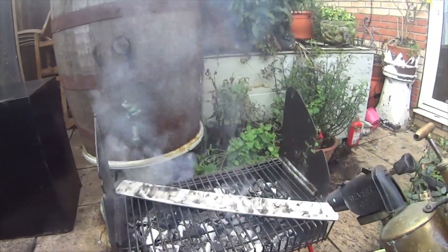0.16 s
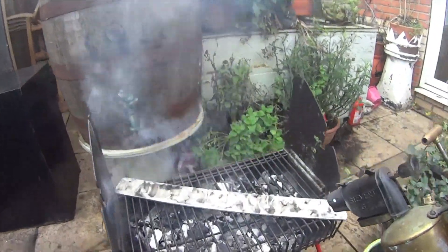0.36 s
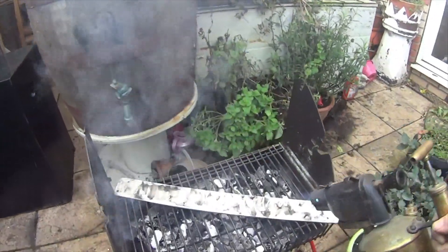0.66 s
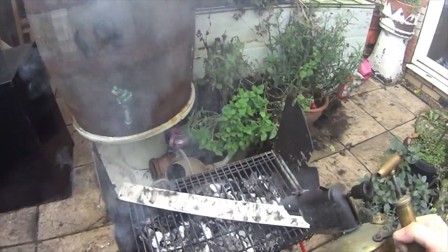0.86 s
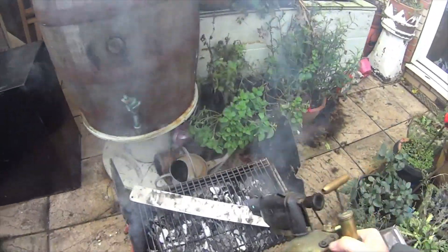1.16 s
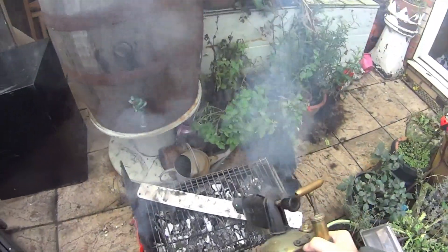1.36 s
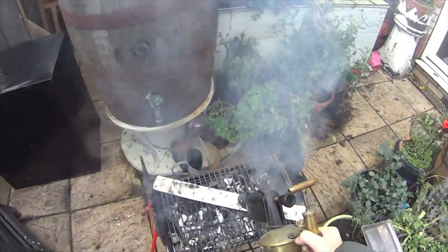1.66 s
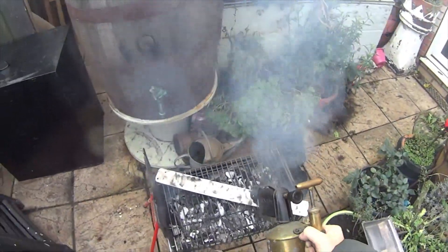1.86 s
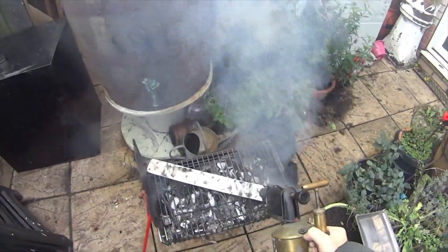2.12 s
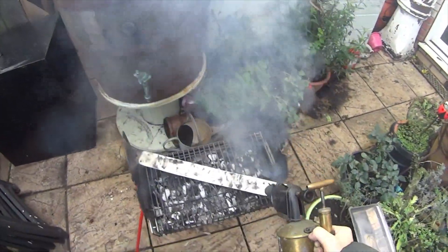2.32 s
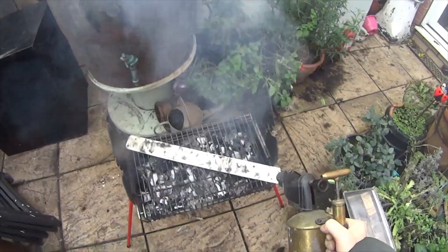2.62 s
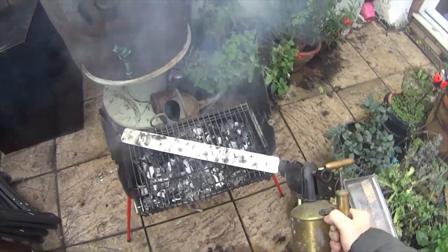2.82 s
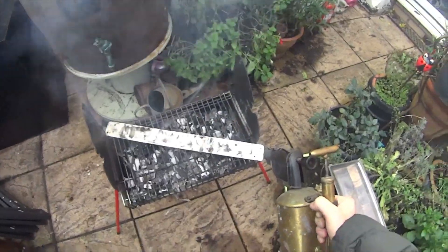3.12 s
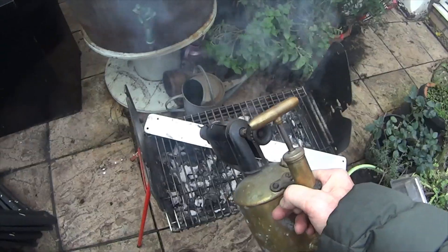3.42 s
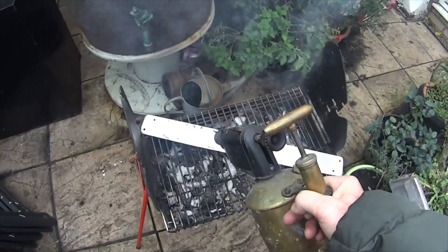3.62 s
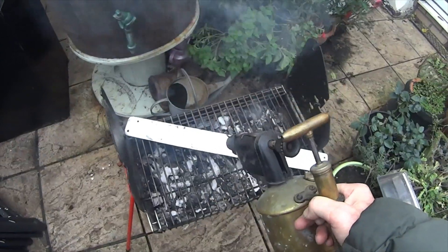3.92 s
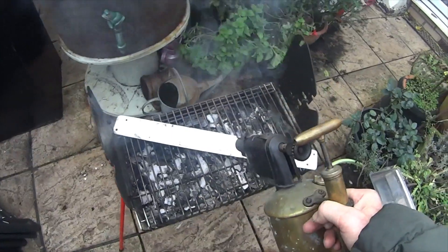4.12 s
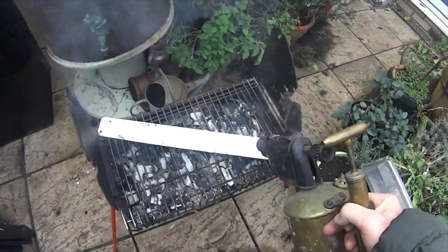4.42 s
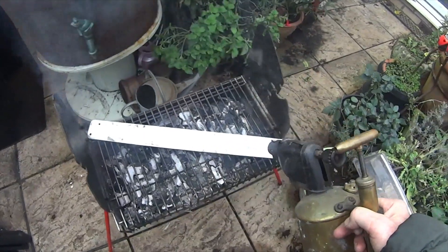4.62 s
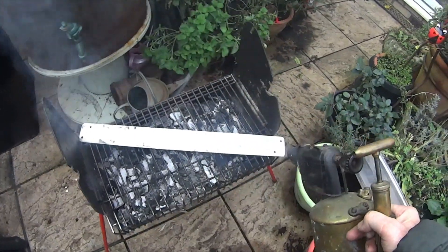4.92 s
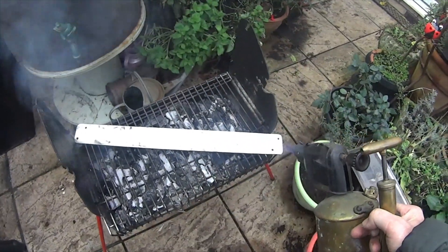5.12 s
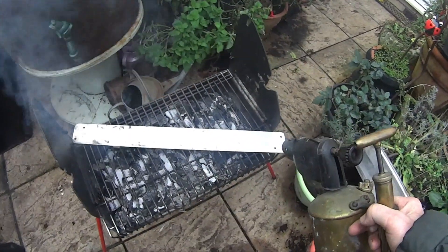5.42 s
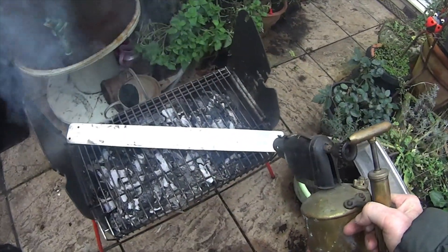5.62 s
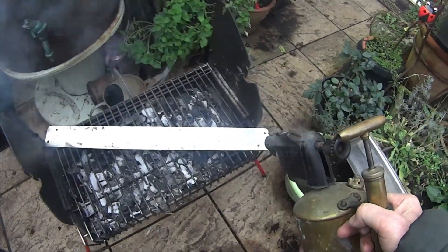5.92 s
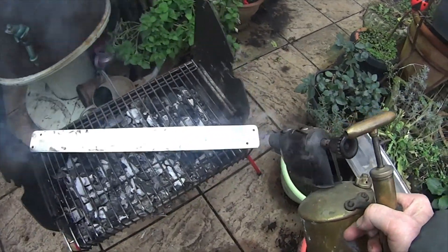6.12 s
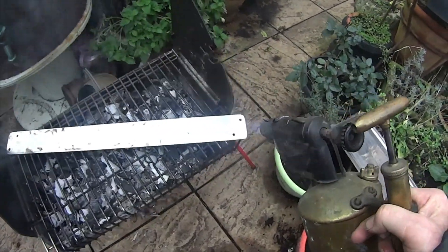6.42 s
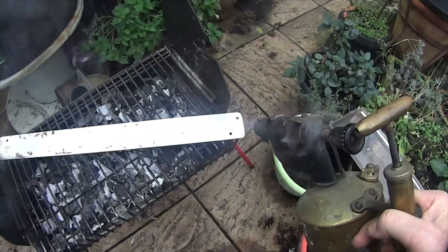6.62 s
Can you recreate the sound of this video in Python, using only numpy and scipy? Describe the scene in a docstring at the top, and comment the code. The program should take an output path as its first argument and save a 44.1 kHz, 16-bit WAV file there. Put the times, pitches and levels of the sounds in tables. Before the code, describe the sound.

A petrol blowtorch burns close to a hand-held microphone in a paved yard, giving a steady, fluttering hiss with a thin whistle and a faint low roar. Metal clinks lightly twice. A finger then knocks and rubs on the microphone, briefly muffling the flame, and the sound cuts out for an instant. The hiss returns and grows a little louder.

```python
"""A petrol blowtorch heats an aluminium strip on a barbecue in a paved yard, near a hand-held camera.
The flame flutters and roars in its tube, the vapour jet hisses; echoes off grill and paving sweep.
At 2 s metal clinks twice and the burner starts to turn away. Just before 3 s a finger knocks, rubs and
briefly covers the microphone. At 3.2 s the sound drops out for a moment.
The torch then burns on, grows louder and draws back from the grill."""
import sys
import numpy as np
from scipy import signal
from scipy.fft import rfft, irfft, next_fast_len
from scipy.io import wavfile
from scipy.ndimage import uniform_filter1d, minimum_filter1d

SR = 44100
rng = np.random.default_rng(int(sys.argv[2]) if len(sys.argv) > 2 else 0)


def output_pcm(signal):
    """Save a mono or channel-first signal as 16-bit PCM at the path in sys.argv[1].

    Samples are clipped to [-1, 1] before scaling.
    """
    pcm = np.clip(np.atleast_2d(signal).T, -1, 1) * 32767
    wavfile.write(sys.argv[1], SR, np.round(pcm).astype(np.int16))


N = 298116

# Flame and jet loudness as the torch moves. Each row: time in seconds, gain in dB.
TORCH_GAIN = [(0, -16.5), (1.3, -16), (2.05, -19.5), (2.45, -18), (3.22, -19), (3.35, -20), (3.75, -18.5),
              (4.1, -15.5), (5.3, -16), (6.75, -14.5)]
# Noise spectra; side and rear are aspects of the burner. Each row: frequency in Hz, relative density in dB.
FLAME_SIDE_SPECTRUM = [(450, -46.5), (650, -29), (760, -17.5), (950, -12.5), (1300, -6.5), (1500, -10),
                       (1750, -8), (2000, 3), (2300, 0.5), (2700, -3.5), (3200, -5), (3550, -13.5),
                       (3850, -17.5), (4500, -37), (6000, -72.5)]
FLAME_REAR_SPECTRUM = [(450, -37), (650, -26), (800, -15.5), (970, -16), (1150, -9.5), (1350, -10.5),
                       (1750, -11), (2060, 0), (2500, -0.5), (3150, -5.5), (3380, -10), (3600, -10),
                       (3950, -20.5), (6000, -79.5)]
JET_SIDE_SPECTRUM = [(3300, -22), (4000, -4), (5000, 5), (5900, -6), (6600, -2), (7300, -5), (8300, -3.5),
                     (9200, -11), (10000, -7.5), (11200, -14.5)]
JET_REAR_SPECTRUM = [(3300, -25), (4000, -3), (5300, 3), (6000, -11), (6800, -0.5), (7400, -5.5),
                     (8200, -5), (9200, -13.5), (10100, -7), (11200, -16.5)]
ROAR_SPECTRUM = [(20, -23), (90, -10.5), (160, -4), (260, 2), (400, -0.5), (560, -5.5), (770, -7.5),
                 (1200, -19)]
RUB_SPECTRUM = [(60, 4.5), (300, 1), (800, -1.5), (1700, 3.5), (2400, -13.5), (3600, 6), (4600, -9.5),
                (7500, -9), (11000, -24)]
# Burner resonances. Each row: frequency in Hz, width in Hz, side level in dB, rear level in dB.
BURNER_MODES = [(1337, 70, -23.5, -24.5), (2112, 130, -35.5, -16), (3605, 110, -27, -33)]
# Brief notes. Each row: middle in seconds, length in seconds, pitch in Hz, level in dB re their hiss.
FLAME_HOOTS = [(.03, 0.16, 2484, -4), (.25, 0.49, 1320, -12), (.28, .16, 2615, -7.5),
               (.39, .22, 2314, -5.5), (.61, .22, 3130, -7.5), (1.16, 0.21, 2222, -4.5),
               (1.45, .45, 2818, -6.5), (1.92, .22, 2413, -7.5), (2.29, .16, 1798, -6.5),
               (2.41, .18, 2192, -3), (2.58, .22, 2453, -7.5), (2.76, .12, 2790, -1.5),
               (3.04, .1, 1934, -4), (3.17, .12, 2746, -1.5), (3.6, .17, 2620, -3.5),
               (4.15, .2, 2325, -2.5), (4.31, .2, 2764, -5), (4.7, .22, 2495, -2), (5.58, .55, 3116, -8),
               (6.16, .3, 2130, -5.5)]
JET_SWISHES = [(.05, 0.4, 4570, -4), (.44, .14, 6220, -8.5), (.63, .14, 4310, -0.5)]
# Nozzle whistle. Each row: time in seconds, pitch in Hz, level in dB re the jet's hiss.
JET_WHISTLE = [(0, 6210, -22), (1.4, 6830, -8.5), (3.3, 6734, -7.5), (5.5, 6796, -11.5), (6.1, 6930, -5)]
# Extra vapour. Each row: start in seconds, length in seconds, level in dB re the jet.
JET_SPURTS = [(.45, .17, -1.5), (1.42, 0.17, 1), (4.47, .07, -6.5), (5.8, .08, -4)]
# Burner over the grill. Each row: time in seconds, reach from 0 to 1.
GRILL_REACH = [(0, 0.06), (.6, 0.1), (1.2, 0.66), (1.8, 0.98), (3.35, .4), (3.65, 0.98), (4.15, .85),
               (4.7, 0.56), (6.75, 0.08)]
# Echo off the strip; its edge can flip the sign. Each row: time in seconds, delay in ms, signed gain.
STRIP_ECHO = [(.4, .78, -0.048), (1.2, 1.28, 0.23), (3.23, 1.13, 0.021), (3.34, 1.416, -.3),
              (3.9, 1.19, -0.092), (4.5, 0.7, 0.036), (6.75, 0.61, 0.19)]
# Torch direction. Each row: time in seconds, left minus right in dB.
TORCH_PAN = [(.25, -2.5), (1.3, -.6), (2.3, -2), (3.3, 0), (4.1, .8), (5.2, -0.6)]
# Stereo likeness in the yard. Each row: frequency in Hz, left-right correlation.
STEREO_CORRELATION = [(60, 0.24), (160, 0.51), (400, 0.17), (660, 0.078), (1060, 0.64), (1700, 0.69),
                      (2750, 0.87), (4400, 0.79), (7200, 0.37), (11000, 0.43)]
# Finger knocks. Each row: start in seconds, thump peak in dB, thump cut-off in Hz, click drive in dB.
FINGER_KNOCKS = [(2.448, -19, 700, -45), (2.7514, -17, 504, -3), (2.784, -25, 400, -1.5),
                 (2.9076, -9, 750, -42), (2.943, 2, 3590, -10.5), (2.958, -9.5, 1780, -4.5)]
# Camera shell. Each row: frequency in Hz, width in Hz, gain in dB.
SHELL_MODES = [(3000, 770, -11), (5300, 310, 3.5), (6100, 170, -8), (10360, 2900, -17.5)]
# Hand movements. Each row: start in seconds, length in seconds, level in dB.
GRIP_SHIFTS = [(1.66, .03, -47), (1.94, .02, -45), (2.1, 0.29, -47), (2.45, .03, -37.5), (2.63, 0.053, -42),
               (2.735, 0.042, -31.5), (2.797, 0.036, -30.5), (2.89, 0.09, -26.5), (3.175, .012, -49)]
FINGER_RUBS = [(2.81, .17, -29.5), (2.89, 0.016, -24), (2.927, .007, -19)]
# Light metal contacts. Each row: start in seconds, gain in dB.
METAL_CONTACTS = [(2.019, -18), (2.047, -12.5)]
# Their ring. Each row: frequency in Hz, relative level in dB.
METAL_MODES = [(1390, 3.5), (4200, -12), (6850, -13.5)]

GAP_START_S, GAP_END_S = 3.218, 3.34


def torch(turn_start_s=1.99, turn_end_s=4.27, flutter_db=1.0, surge_db=0.57, spit_db=1.0, jet_db=-17.5):
    """Flame, jet and roar flutter with one shared fuel flow."""
    torch_db, = curves(TORCH_GAIN)
    rear = np.interp(seconds(), [turn_start_s, turn_end_s], [0, 1])
    flame, jet, roar = burner_flame(rear), vapour_jet(rear), low_roar()
    flow = unit(amp(flutter_db * wobble(320) + surge_db * wobble(35)))
    jet_gain = amp(jet_db + spit_db * wobble(25))  # fuel leaves the nozzle unevenly
    return flow * (amp(torch_db) * (flame + jet_gain * jet) + roar)


def burner_flame(rear):
    """Turbulent burning rings the tube and catches brief hollow notes."""
    hiss = aimed_noise(FLAME_SIDE_SPECTRUM, FLAME_REAR_SPECTRUM, rear)
    for hz, width_hz, side_db, rear_db in BURNER_MODES:
        mode = stereo_noise(lambda f: resonance(f, hz, width_hz) ** 2)
        hiss += amp(between((side_db, rear_db), rear)) * mode
    return voiced(hiss, passing_tones(FLAME_HOOTS, width_hz=84, sag_hz_per_s=60))


def vapour_jet(rear):
    """Vapour hisses, whistles and spurts from the nozzle."""
    hiss = aimed_noise(JET_SIDE_SPECTRUM, JET_REAR_SPECTRUM, rear)
    whistle = held_tone(*curves(JET_WHISTLE), width_hz=190)
    swishes = passing_tones(JET_SWISHES, width_hz=220, sag_hz_per_s=320)
    spurts = bursts(JET_SPURTS, attack_s=0.039, release_s=0.077)
    return voiced(hiss, whistle, swishes) * np.hypot(1, spurts)


def low_roar(boom_hz=382.3, boom_db=3, fade_db_per_s=5, before_gap_db=-37.5, after_gap_db=-40.5):
    """The flame's low roar, with a hollow boom that dies away."""
    noise = coloured_noise(ROAR_SPECTRUM)
    boom = held_tone(boom_hz, boom_db - fade_db_per_s * seconds(), width_hz=63)
    level_db = np.where(seconds() > GAP_START_S, after_gap_db, before_gap_db)
    return amp(level_db) * voiced(noise, boom)


def near_echoes(x, coals_gain=0.094, coals_ms=(3.0, 2.026), paving_gain=0.16, paving_ms=(4.05, 3.6)):
    """Strip, coals and paving comb the sound; notches and pan glide as the torch moves."""
    reach, = curves(GRILL_REACH)
    strip_ms, strip_gain = curves(STRIP_ECHO)
    pan_db, = curves(TORCH_PAN)
    paths = [(strip_gain, strip_ms),
             (coals_gain, between(coals_ms, reach)),
             (paving_gain, between(paving_ms, reach))]
    power = 1 + strip_gain ** 2 + coals_gain ** 2 + paving_gain ** 2
    return (x + echoes(x, paths)) / np.sqrt(power) * amp([pan_db / 2, -pan_db / 2])


def far_echoes(x, gain=0.12, nearest_ms=4.6, farthest_ms=17, drift_ms=0.15, count=7):
    """Weak later echoes off pots, drum and walls ripple the hiss."""
    paths = [(gain, ms + drift_ms * wobble(1.2)) for ms in np.geomspace(nearest_ms, farthest_ms, count)]
    return (x + echoes(x, paths)) / np.sqrt(1 + count * gain ** 2)


def knocks(thump_t60_s=0.026, click_t60_s=0.0098, grit=0.14):
    """Each knock pushes the camera body and clicks its plastic shell."""
    t = np.arange(SR // 8) / SR
    thumps, clicks = np.zeros(N), np.zeros(N)
    for start_s, thump_db, cutoff_hz, click_db in FINGER_KNOCKS:
        start = round(start_s * SR)
        push = (t == 0) + grit * rng.standard_normal(len(t)) * amp(-60 * t / thump_t60_s)
        thump = signal.sosfilt(signal.butter(2, [30, cutoff_hz], "band", fs=SR, output="sos"), push)
        thumps[start:][:len(t)] += amp(thump_db) * thump / np.abs(thump).max()
        clicks[start:][:len(t)] += amp(click_db - 60 * t / click_t60_s) * rng.standard_normal(len(t))
    shell = lambda f: sum(amp(db) * resonance(f, hz, width_hz) for hz, width_hz, db in SHELL_MODES)
    return thumps + filtered(clicks, shell)


def finger_rub(catch_db=1.0):
    """Skin catches and slips over the microphone."""
    friction = unit(amp(catch_db * wobble(360))) * coloured_noise(RUB_SPECTRUM)
    return bursts(FINGER_RUBS, attack_s=0.009, release_s=0.0074) * friction


def finger_cover(start_s=2.77, close_s=0.028, open_s=0.24, depth_db=-19.5):
    """Gain as the finger shuts the microphone port fast and slides off slowly."""
    return amp(np.interp(seconds() - start_s, [0, close_s, close_s + open_s], [0, depth_db, 0]))


def clinks(t60_s=0.031, attack_s=0.00084):
    """Metal touches metal and rings briefly."""
    t = np.arange(SR // 8) / SR
    modes = sum(amp(db) * np.sin(2 * np.pi * hz * t) for hz, db in METAL_MODES)
    ring = modes * amp(-60 * t / t60_s) * (1 - np.exp(-t / attack_s))
    out = np.zeros(N)
    for start_s, db in METAL_CONTACTS:
        out[round(start_s * SR):][:len(t)] += amp(db) * ring
    return out


def grip_rumble(rest_db=-62.5, body_hz=46, width_hz=28, cutoff_hz=300):
    """The hand rumbles through the camera body, more as the grip shifts."""
    grip = amp(rest_db) + bursts(GRIP_SHIFTS, attack_s=0.0065, release_s=0.015)
    body = lambda f: resonance(f, body_hz, width_hz) / (1 + 1j * f / cutoff_hz)
    return grip * unit(filtered(rng.standard_normal(N), body))


def aimed_noise(side_spectrum, rear_spectrum, rear):
    """Hiss changes colour as the burner turns from side (0) to rear (1)."""
    return np.sqrt(1 - rear) * coloured_noise(side_spectrum) + np.sqrt(rear) * coloured_noise(rear_spectrum)


def coloured_noise(spectrum):
    """Stereo noise shaped by a spectrum table."""
    return stereo_noise(lambda hz: amp(log_interp(spectrum, hz)))


def stereo_noise(response):
    """Filtered noise of rms 1 with the yard's left-right correlation."""
    def split(hz):
        angle = stereo_angle(hz)
        return response(hz) * np.array([np.cos(angle), np.sin(angle)])
    mid, side = filtered(rng.standard_normal((2, N)), split)
    return unit(np.array([mid + side, mid - side]))


def stereo_angle(hz):
    """Mid-side angle in radians."""
    return np.arccos(log_interp(STEREO_CORRELATION, hz)) / 2


def voiced(hiss, *tones):
    """Resonances, as (sound, power), take their share of power from the hiss."""
    mix = hiss + sum(sound for sound, _ in tones)
    return mix / np.sqrt(1 + sum(power for _, power in tones))


def held_tone(hz, db, width_hz):
    """Noise in one lasting resonance; returns sound and power."""
    return amp(db) * ringing(slow_swing(width_hz), hz * np.ones(N)), amp(db) ** 2


def passing_tones(rows, width_hz, sag_hz_per_s):
    """Resonances swell and fade as their pitch sags; returns sound and power."""
    swing, sound, power = slow_swing(width_hz), np.zeros((2, N)), np.zeros(N)
    for k, (middle_s, length_s, hz, db) in enumerate(rows):
        near = np.flatnonzero(np.abs(seconds() - middle_s) < 2 * length_s)
        t = near / SR - middle_s
        gain = amp(db) * 0.5 ** (2 * (t / length_s) ** 2)  # half power at +-length_s / 2
        sound[:, near] += gain * ringing(swing[:, (near + k * SR) % N], hz - sag_hz_per_s * t)
        power[near] += gain ** 2
    return sound, power


def slow_swing(width_hz):
    """Unsteady complex amplitude of a narrow resonance, mid and side."""
    band = filtered(rng.standard_normal((4, N)), lambda f: 1 / (1 + 1j * f / width_hz) ** 2)
    return band[:2] + 1j * band[2:]


def ringing(swing, hz):
    """A swing carried on a per-sample pitch; stereo, rms 1."""
    mid, side = np.real(swing * np.exp(2j * np.pi * np.cumsum(hz) / SR))
    side = side * np.tan(stereo_angle(hz.mean()))
    return unit(np.array([mid + side, mid - side]))


def echoes(x, paths):
    """Sum of copies of x over moving (gain, delay in ms) paths."""
    fine = signal.resample_poly(x, 2, 1, axis=1)  # double rate keeps the treble when interpolating
    total = np.zeros_like(x)
    for gain, delay_ms in paths:
        position = 2 * (np.arange(N) - delay_ms * SR / 1000)
        whole = np.floor(position).astype(int)
        before = fine.take(whole, axis=1, mode="wrap")
        after = fine.take(whole + 1, axis=1, mode="wrap")
        total += gain * (before + (position - whole) * (after - before))
    return total


def bursts(rows, attack_s, release_s):
    """Gain of events that rise, hold and decay."""
    t, power = seconds(), np.zeros(N)
    for start_s, length_s, db in rows:
        edge = np.minimum((t - start_s) / attack_s, (start_s + length_s - t) / release_s)
        power += amp(db) ** 2 * np.exp(2 * np.minimum(0, edge))
    return np.sqrt(power)


def wobble(rate_hz):
    """Smooth random curve with knots at rate_hz."""
    knots = rng.standard_normal(int(N * rate_hz / SR) + 4)
    fine = signal.resample(knots, 10 * len(knots))
    return np.interp(np.arange(N) * (10 * rate_hz / SR), np.arange(len(fine)), fine)


def filtered(x, response):
    """Apply a complex frequency response."""
    size = next_fast_len(N + SR // 4)
    return irfft(rfft(x, size) * response(np.fft.rfftfreq(size, 1 / SR)), size)[..., :N]


def resonance(f, hz, width_hz):
    """Response of one damped mode."""
    return 1j * f * width_hz / (hz * hz - f * f + 1j * f * width_hz)


def log_interp(points, hz):
    """Read (Hz, value) points on a log axis."""
    point_hz, values = np.transpose(points)
    return np.interp(np.log(hz + 1), np.log(point_hz + 1), values)


def curves(rows):
    """Per-sample curve for each column after the time."""
    times_s, *columns = np.transpose(rows)
    return [np.interp(seconds(), times_s, column) for column in columns]


def between(ends, share):
    """Linear blend of two values."""
    return ends[0] + share * (ends[1] - ends[0])


def seconds():
    """Time of every sample."""
    return np.arange(N) / SR


def amp(db):
    """Decibels to gain."""
    return 10 ** (np.asarray(db) / 20)


def unit(x):
    """Scale to rms 1."""
    return x / np.sqrt(np.mean(x ** 2) + 1e-20)


def limiter(x, ceiling_db=-5.5, hold_s=0.0066):
    """Gain dips around the tallest peaks."""
    needed = np.minimum(1, amp(ceiling_db) / (np.abs(x).max(axis=0) + 1e-9))
    span = int(hold_s * SR)
    return x * uniform_filter1d(minimum_filter1d(needed, span), span)


def dropout(fade_out_s=0.025, fade_in_s=0.032, floor_db=-60):
    """Gain that shuts for the brief gap."""
    t = seconds()
    opening = np.clip(np.maximum((GAP_START_S - t) / fade_out_s, (t - GAP_END_S) / fade_in_s), 0, 1)
    return np.maximum(amp(floor_db), np.sin(np.pi / 2 * opening) ** 2)


def scene():
    """Torch and echoes, briefly covered, plus clinks and handling noise."""
    yard = far_echoes(near_echoes(torch()))
    return finger_cover() * yard + clinks() + grip_rumble() + finger_rub() + knocks()


def record(dry):
    """Limiter, dropout, brick-wall low-pass."""
    return filtered(limiter(dry) * dropout(), lambda hz: hz < 11150)


dry = scene()
out = record(dry)
output_pcm(out)
```